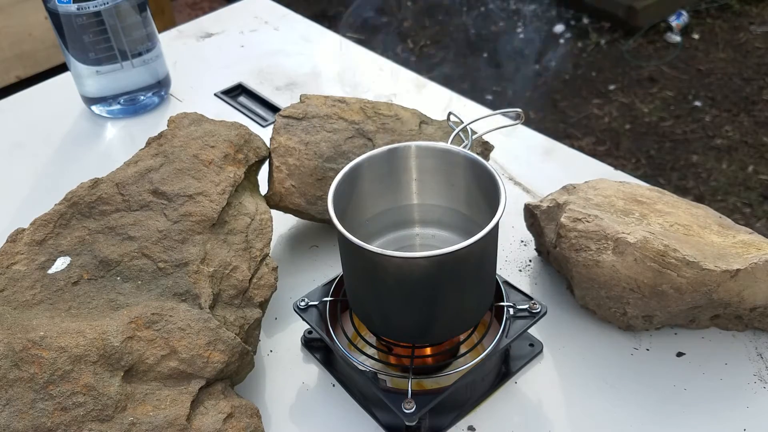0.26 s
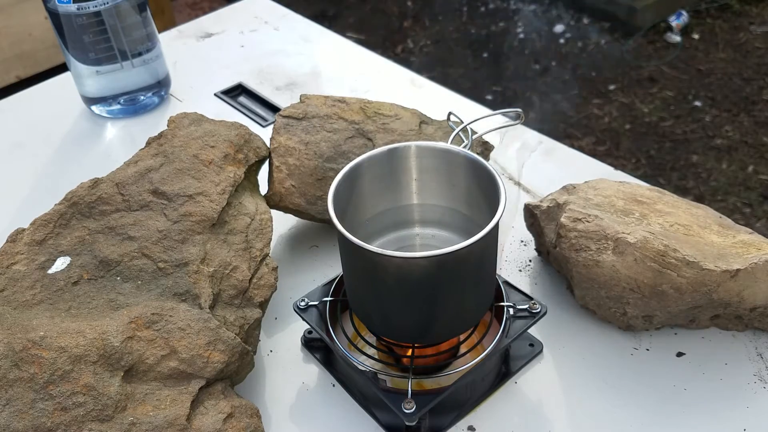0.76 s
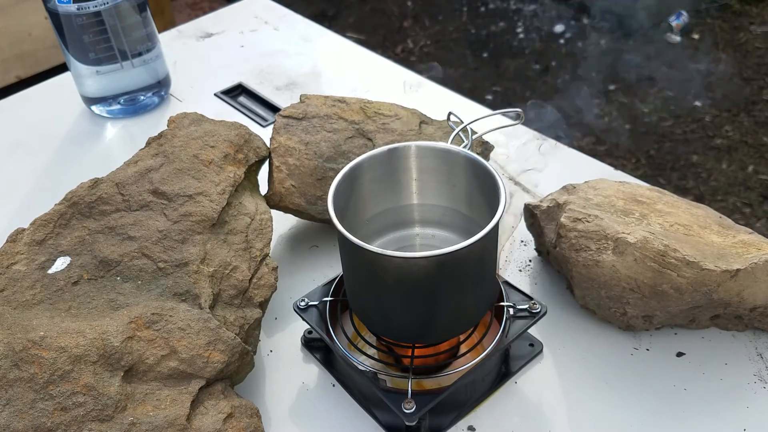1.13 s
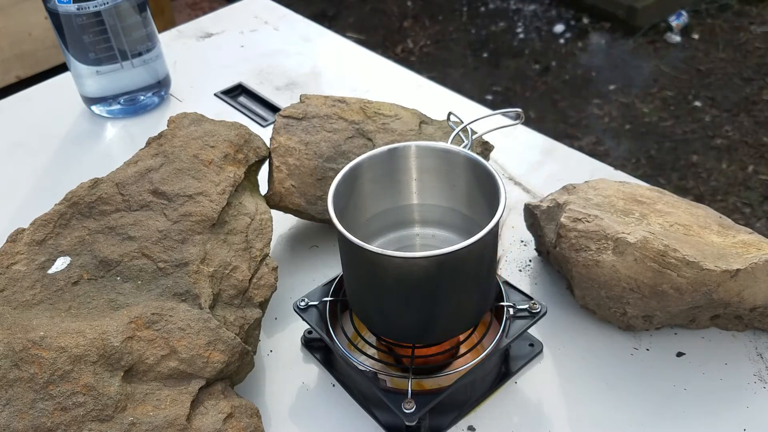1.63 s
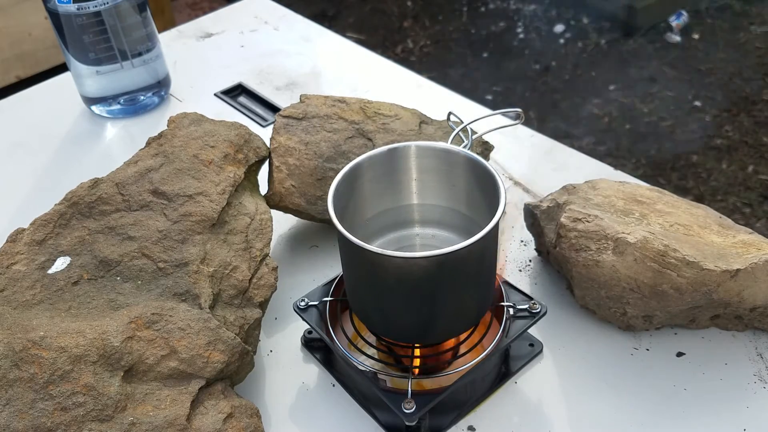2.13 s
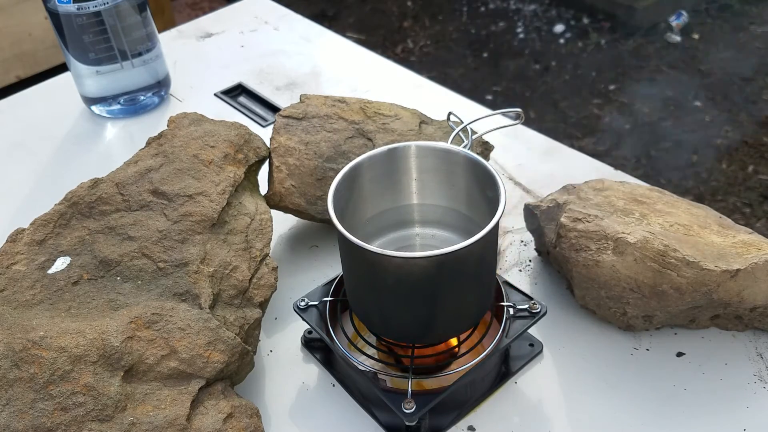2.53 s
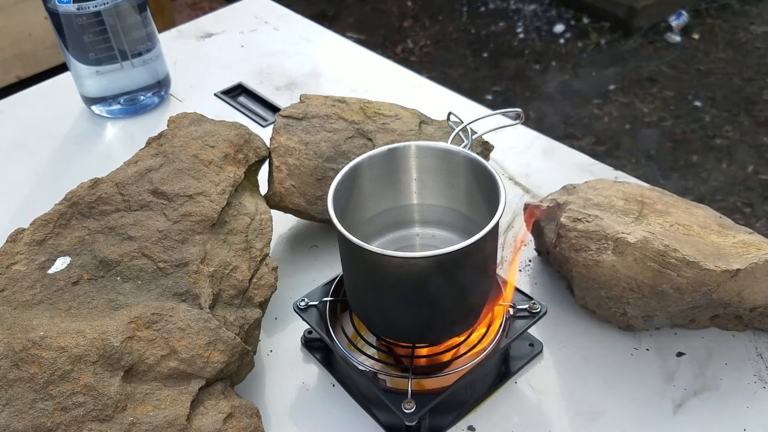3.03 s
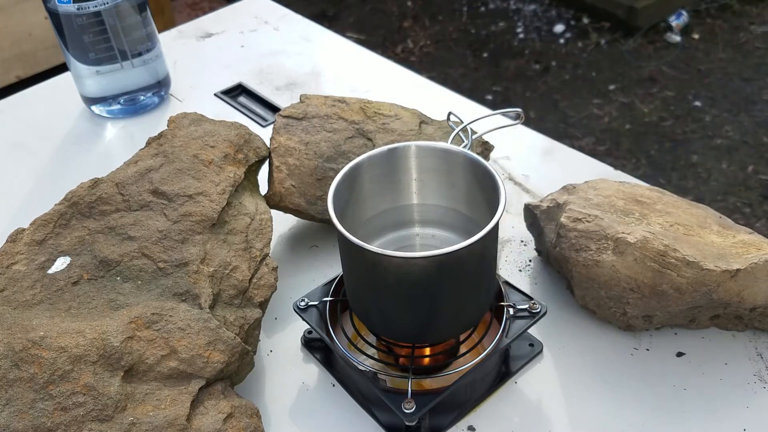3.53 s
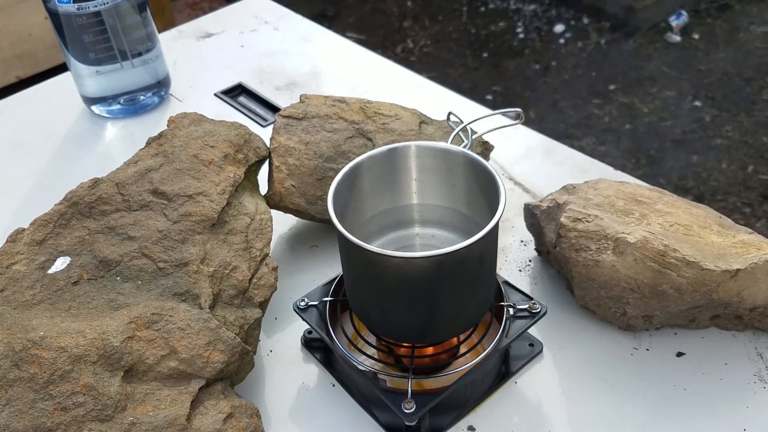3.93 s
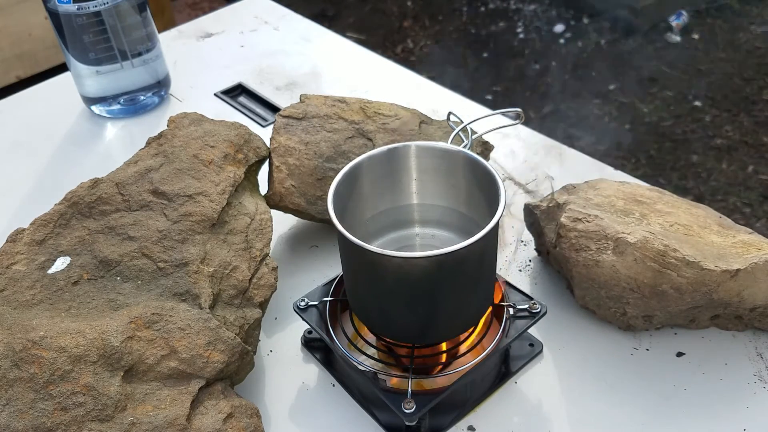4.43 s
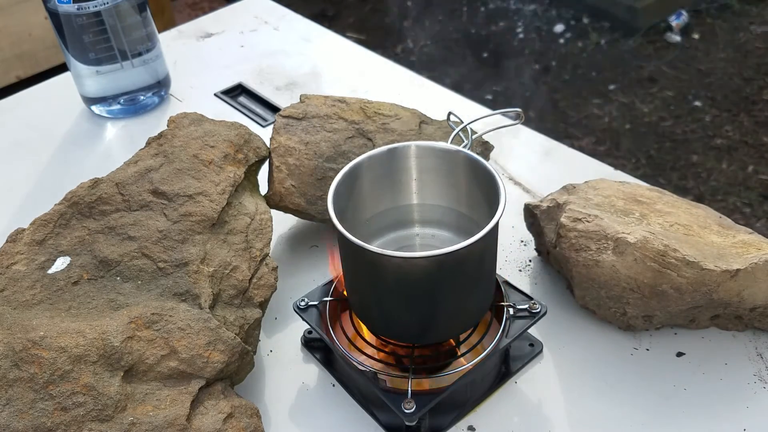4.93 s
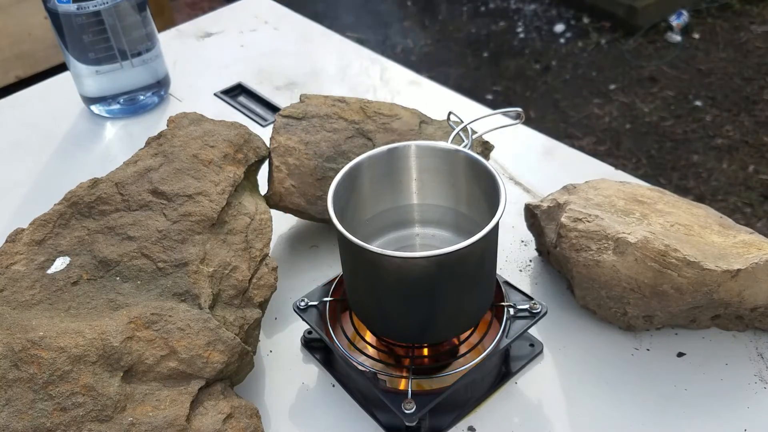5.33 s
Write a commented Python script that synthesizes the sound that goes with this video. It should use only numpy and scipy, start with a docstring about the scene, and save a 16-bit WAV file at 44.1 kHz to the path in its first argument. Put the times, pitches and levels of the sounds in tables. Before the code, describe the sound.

Deep single barks from a near dog and a hoarse farther one echo outdoors, with crackling, hissing stove fuel close in front.

```python
"""Two large dogs bark at each other across a yard: one close by, with a clear "woo" that breaks into a rasp,
one farther off and hoarse. Close in front a small camp stove sizzles and spits; behind lie distant traffic,
soft low thumps of air, faint high tones and one thin, airy screech.
Barks: modelled vocal folds through mouth resonances, with wall echoes and a decaying tail.
Stove and background: shaped noise under level curves."""
import sys
import numpy as np
from scipy import signal
from scipy.io import wavfile
from scipy.ndimage import uniform_filter1d, minimum_filter1d, map_coordinates

SR = 44100
rng = np.random.default_rng(int(sys.argv[2]) if len(sys.argv) > 2 else 0)


def file_out(sig):
    """Save sig as 16-bit WAV at sys.argv[1]."""
    # one column per channel
    cols = np.atleast_2d(sig).T
    # limit, then scale
    lim = np.clip(cols, -1, 1)
    pcm = np.round(lim * 32767).astype(np.int16)
    wavfile.write(sys.argv[1], SR, pcm)


N = 245809


def from_db(db):
    """Decibels to gain."""
    return 10 ** (np.asarray(db) / 20)


def rms_one(x):
    """Scale to rms 1."""
    return x / np.sqrt(np.mean(x ** 2) + 1e-20)


def ramp(t, length_s):
    """Rise from 0 to 1 over length_s, starting at t = 0."""
    return np.clip(t / max(length_s, 1e-4), 0, 1)


def in_time(rows, t):
    """Columns of a curve table at the times t."""
    s, *columns = np.transpose(rows)
    return [np.interp(t, s, c) for c in columns]


def at_hz(points, hz):
    """Columns of a spectrum table at one frequency, interpolated over log frequency."""
    f, *columns = np.transpose(points)
    return [np.interp(np.log(hz), np.log(f), c) for c in columns]


def add(out, s, x):
    """Mix x into out from time s on."""
    i = max(round(s * SR), 0)
    out[i:i + len(x)] += x[:max(N - i, 0)]


def drift(rate_per_s, size):
    """Smooth chance of spread about 1, from rate_per_s random knots a second."""
    knots = rng.standard_normal(int(size * rate_per_s / SR) + 4)
    position = 1 + rng.random() + np.arange(size) * rate_per_s / SR
    return map_coordinates(knots, [position], order=2, mode="nearest")


def band(x, hz, width_hz):
    """A steep-sided resonance, geometrically centred on hz."""
    low = np.hypot(hz, width_hz / 2) - width_hz / 2
    high = min(low + width_hz, SR / 2 - 1000)
    return signal.sosfilt(signal.butter(2, [low, high], "band", fs=SR, output="sos"), x)


def even(x, span_s=0.0081):
    """Hold the short-term rms at 1."""
    return x / np.sqrt(np.abs(uniform_filter1d(x * x, int(span_s * SR))) + 1e-12)


def noise_bands(size, likeness):
    """Half-octave bands of stereo noise with their centres; likeness is the left-right correlation."""
    white = rng.standard_normal((2, 2, size))
    for k, hz in enumerate(np.geomspace(28, 14336, 19)):
        mid, side = band(white[k % 2], hz, hz / np.sqrt(8))   # adjacent bands use separate noise
        alike = np.clip(at_hz(likeness, hz)[0], 0, 1)
        yield hz, np.sqrt(1 + alike) * mid + np.sqrt(1 - alike) * np.array([side, -side])


def coloured(spectrum, patchy_db):
    """Stereo noise of a given spectrum, each band wavering by itself; rms 1."""
    # left-right likeness: f/Hz, correlation 0-1
    likeness = [(60, .35), (140, .78), (210, .93), (400, .98), (1130, .97), (2600, .9), (12000, .92)]
    total = 0
    for hz, noise in noise_bands(N, likeness):
        waver = np.repeat(drift(700, N // 64 + 1), 64)[:N]   # stretched 64-fold: about 11 knots a second
        total = total + noise * from_db(at_hz(spectrum, hz)[0] + patchy_db * waver)
    return rms_one(total)


def traffic(level_db):
    """Distant traffic under a faint hiss: steady noise, strongest in the low and middle range."""
    # f/Hz, relative density/dB per Hz
    spectrum = [(28, -20.5), (55, -16.5), (100, -10), (190, -1), (400, -3), (760, 0), (1150, -5.5),
                (1850, -26), (2400, -28), (3400, -33), (7000, -36.5), (11000, -41), (14300, -47)]
    return from_db(level_db) * coloured(spectrum, patchy_db=.8)


def whine():
    """Thin, unsteady high tones: very narrow bands of noise."""
    # f/Hz, level/dB
    tones = [(2270, -69), (5561, -74.5), (11063, -78)]
    return sum(from_db(db) * rms_one(band(rng.standard_normal(N), hz, .009 * hz)) for hz, db in tones)


def screech(t, spread_hz, breath_db):
    """A narrow, airy band of noise that rises and sinks, over a broader breath."""
    # t/s, centre f/Hz, whistle level/dB
    glide = [(.74, 3290, -62), (.79, 3700, -61), (.865, 3910, -57.5), (.93, 3740, -59.5), (1.07, 3490, -64),
             (1.13, 3250, -75)]
    hz, db = in_time(glide, t)
    whistle = rms_one(np.sin(2 * np.pi * np.cumsum(hz) / SR) * drift(spread_hz, N))
    breath = rms_one(band(rng.standard_normal(N), 2900, 1200))
    sounding = (t > glide[0][0]) * (t < glide[-1][0])
    return from_db(db) * (whistle + from_db(breath_db) * breath) * sounding


def buffets(t, centre_hz, length_s):
    """Light air buffets the microphone: soft low thumps, independent left and right."""
    # peak t/s, level/dB
    thumps = [(2.6, -59), (3.44, -45), (4.43, -43.5), (4.63, -44), (5.05, -46.5)]
    push = sum(from_db(db) * np.exp(-((t - s) / length_s) ** 2) for s, db in thumps)
    return push * rms_one(band(rng.standard_normal((2, N)), centre_hz, centre_hz))


def jet(t):
    """Vapour escapes in one smooth hiss that dies away."""
    # t/s, level/dB
    decay = [(0, -45), (.17, -46), (.27, -53.5), (.38, -58.5), (.46, -66)]
    # f/Hz, relative density/dB per Hz
    spectrum = [(1500, -27), (2800, -1), (4000, -12), (5400, -6.5), (7000, -23.5), (9000, -22.5)]
    level_db, = in_time(decay, t)
    return from_db(level_db) * coloured(spectrum, patchy_db=1.0) * (t < decay[-1][0])


def sizzle(t, level_db):
    """The fuel sizzles in spurts: grainy hiss, swelling and dying exponentially."""
    # peak t/s, level/dB ahead of level_db, swell time/s, dying time/s
    spurt_rows = [(0.1, -50.5, .4, 0.13), (0.49, -45, 0.024, 0.087), (1.16, -47, 0.023, 0.13),
                  (1.84, -46, 0.061, 0.15), (1.933, -39.5, 0.045, 0.021), (2.14, -42, 0.033, .015),
                  (2.51, -40, .03, 0.032), (2.68, -48.5, 0.071, 0.081), (2.96, -44.5, 0.11, 0.039),
                  (3.012, -33.5, 0.032, 0.034), (3.085, -41, 0.011, 0.01), (3.612, -42, 0.042, 0.054),
                  (3.69, -43.5, 0.0088, 0.031), (3.8, -50, 0.029, 0.032), (4.06, -49.5, 0.048, .08),
                  (4.15, -46.5, 0.11, 0.053), (4.22, -45.5, .012, 0.015), (4.42, -46, 0.0058, 0.042)]
    # f/Hz, relative density/dB per Hz
    spectrum = [(1000, -30), (2200, 9), (3100, -6), (4300, -6.5), (6200, 0), (8500, -7), (11000, -16),
                (13500, -8), (15500, -28.5)]
    simmer_db = -67   # floor between spurts, ahead of level_db
    spurts = [from_db(db) * np.exp(-np.maximum((s - t) / swell_s, (t - s) / dying_s))
              for s, db, swell_s, dying_s in spurt_rows]
    vigour = np.maximum(np.max(spurts, axis=0), from_db(simmer_db))
    grains = rms_one(from_db(4.2 * np.clip(drift(900, N), -1.5, 2.8)))
    return from_db(level_db) * vigour * coloured(spectrum, patchy_db=1.0) * grains


def spits(level_db, crack_s, fizz_s, fizz_db):
    """The fuel spits: a droplet bursts with a crack and fizzes out unevenly."""
    # t/s, peak level/dB ahead of level_db, centre f/Hz
    droplets = [(0.234, -38, 7000), (0.487, -31.5, 5900), (1.922, -27.5, 5360), (2.101, -34, 5000),
                (2.129, -23.5, 1940), (2.137, -36, 5300), (2.287, -36, 5730), (2.511, -30.5, 6335),
                (3.003, -27, 5710), (3.619, -28, 5400), (3.8, -40, 7000), (4.146, -31, 6050),
                (4.421, -51, 3970), (4.466, -44, 5000), (4.924, -47, 5930)]
    out, t = np.zeros(N), np.arange(SR // 10) / SR
    for s, db, hz in droplets:
        crack = np.exp(-t / crack_s)
        fizz = from_db(fizz_db + 4.3 * drift(270, len(t))) * np.exp(-t / fizz_s)
        width_hz = min(hz, hz * hz / 3500)   # big, low droplets ring more narrowly
        burst = band(rng.standard_normal(len(t)) * (crack + fizz), hz, width_hz)
        add(out, s, from_db(db + level_db) * burst / np.abs(burst).max())
    return out


def yard(x, echoes, tail_db, build_s):
    """Direct sound, smeared echoes from walls left and right, and a tail that builds up and dies by band."""
    # f/Hz, relative density/dB per Hz, t60/s
    decay = [(150, -6, 1), (400, -5.5, 0.92), (1000, -3, 0.9), (2000, -1.5, 1), (6000, -4, .4),
             (15000, -13.5, .25)]
    # left-right likeness of the tail: f/Hz, correlation 0-1
    tail_likeness = [(150, 1), (430, 1), (750, 1), (1200, 0.48), (2000, 1), (5000, .3)]
    slant_s = .00004   # each channel's shift from the mean arrival
    t = np.arange(SR) / SR
    tail = 0
    for hz, noise in noise_bands(SR, tail_likeness):
        db, t60_s = at_hz(decay, hz)
        tail = tail + noise * from_db(db - 60 * t / t60_s)
    response = from_db(tail_db) * tail * (1 - np.exp(-t / build_s)) / np.sqrt(SR / 10)
    for k, (delay_s, db) in enumerate(echoes):
        arrival_s = delay_s + slant_s * (-1) ** k * np.array([[1], [-1]])   # walls alternate sides
        smear = np.exp(-((t - arrival_s) / 6e-5) ** 2)
        response += from_db(db) * smear / smear.sum(axis=1, keepdims=True)
    return x + signal.fftconvolve(x[None], response, axes=1)[:, :N]


def resonances(source, modes):
    """Sum of the throat's resonances, held at an even level."""
    return even(sum(band(source, hz, width_hz) * from_db(db) for hz, width_hz, db in modes))


def bark(t, pitch_hz, rough, chest_db, mouth_db, snarl_db, mouth, snarl, hiss,
         jitter, shimmer, rasp, chaos, puff_db, push_s):
    """Vocal folds swing cleanly or break into chaos; the mouth's resonances open above the fundamental."""
    size = len(t)
    rough = np.clip(rough, 0, 1)
    phase = 2 * np.pi * np.cumsum(pitch_hz * (1 + jitter * rough * drift(328.2, size))) / SR
    flutter = 1 + shimmer * rough * np.tanh(drift(188.45, size))   # uneven swings make the rasp
    fundamental = np.sin(phase) * flutter + chaos * rough * drift(200, size) * np.cos(phase)
    # the mouth radiates little below the fundamental
    radiation = signal.butter(4, 350, "high", fs=SR, output="sos")
    fundamental = even(signal.sosfilt(radiation, fundamental), span_s=.03)
    # a nearly symmetric swing favours the odd harmonics
    harmonics = [np.cos(k * phase) / k ** .5 * (1 if k % 2 else from_db(-9)) for k in range(2, 8)]
    pulses = rms_one(sum(harmonics))
    air = rng.standard_normal(size) * (1 + np.cos(phase) / 2)   # air passes while the folds are open
    source = ((1 - rough) * pulses + rasp * rough * air) * flutter
    jaw, teeth = resonances(source, mouth), resonances(source, snarl)
    # push of air from the chest, strongest at the start: 4.5 dB above to 4.5 dB below its middle level
    first_push = from_db(4.5 * (1 - 2 * ramp(t - t[0], push_s)))
    puff = rms_one(band(air, 262, 180)) * (0.56 + rough) * first_push
    puff += from_db(-11.5) * rms_one(band(air, 70, 76))
    voice = from_db(chest_db) * fundamental + from_db(puff_db + 0.51 * chest_db) * puff
    voice += from_db(mouth_db) * (jaw + from_db(snarl_db) * teeth)
    # the soft muzzle swallows the treble
    voice = signal.sosfilt(signal.butter(6, 2800, fs=SR, output="sos"), voice)
    hiss_hz, hiss_width_hz, hiss_db = hiss   # air between the teeth, dB relative to the mouth
    voice += from_db(mouth_db + hiss_db) * rms_one(band(air, hiss_hz, hiss_width_hz))
    voice *= from_db(1.35 * rough * drift(69.8, size))   # a rough voice comes in uneven shoves
    return voice * np.clip((t - t[0]) / 0.00098, 0, 1) * np.clip((t[-1] - t) / 0.0051, 0, 1)


def dog(barks, gesture, **throat):
    """All barks of one dog: the gesture turns each row into the controls of the throat."""
    out = np.zeros(N)
    for row in barks:
        t, *controls = gesture(*row)
        add(out, t[0], bark(t, *controls, **throat))
    return out


def hoarse_bark(peak_at_s, swell_s, hold_s, top_hz, rough, chest_db, drop_db, mouth_db, snarl_db):
    """Level and pitch swell out of silence with the push of air, hold, and trail off in a snarl."""
    release_s, drop_s = .14, 0.014   # the fundamental drops when the push ends
    swell_depth_db, swell_curve = 15, 1.65   # rounds off towards its top
    swell_rise_hz, sag_hz_per_s = 40.6, 170
    chest_fall_db_per_s, mouth_fall_db_per_s = 54.5, 154
    slack_rough = .25   # added where the voice is weak
    baring_db_per_s, lips_shut_db = 32.5, 3.5   # the snarl grows as the lips draw back
    t = np.arange(-min(2 * swell_s, peak_at_s), hold_s + release_s, 1 / SR)
    weak, dropped = ramp(-t, swell_s), ramp(t - hold_s, drop_s)
    swell_db = -swell_depth_db * np.maximum(-t / swell_s, 0) ** swell_curve
    released_s = np.maximum(t - hold_s, 0)
    pitch_hz = top_hz - swell_rise_hz * weak - sag_hz_per_s * released_s
    rough = rough + slack_rough * (weak + dropped)
    chest_db = chest_db + swell_db - drop_db * dropped - chest_fall_db_per_s * released_s
    mouth_db = mouth_db + swell_db - mouth_fall_db_per_s * released_s
    snarl_db = snarl_db - lips_shut_db * weak + baring_db_per_s * t
    return peak_at_s + t, pitch_hz, rough, chest_db, mouth_db, snarl_db


def far_dog():
    """The far dog: hoarse swells through a rough throat, with strong wall echoes."""
    # swell top t/s, swell/s, hold/s, top pitch f/Hz, roughness 0-1 ahead of slack, fundamental level/dB,
    # its drop after the hold/dB, mouth level/dB, snarl level/dB re mouth
    barks = [(0.004, .06, 0.015, 417.3, .45, -13, 7, -22.5, -9),
             (0.660, .064, 0.046, 441.2, 0.45, -12.5, 15, -22.5, -9),
             (1.198, .072, 0.029, 395.1, 0.74, -15.5, 8, -16.5, -12),
             (1.630, 0.059, 0.04, 409.1, 0.89, -17.5, 5.5, -19.5, -14.5),
             (2.840, .064, 0.04, 401.7, 0.6, -15, 8, -17, -14.5)]
    # open-mouth resonances: f/Hz, width/Hz, relative level/dB
    mouth = [(732, 147, 2), (1064, 187, 0.5), (1367, 100, -18)]
    # upper resonances of the snarl: f/Hz, width/Hz, relative level/dB
    snarl = [(1743, 180, 26.5), (2530, 240, -13)]
    # wall echoes: delay/s, level/dB re direct
    echoes = [(.027, -6), (0.069, -12), (0.118, -29), (0.171, -19.5)]
    voice = dog(barks, hoarse_bark, mouth=mouth, snarl=snarl, hiss=(5140, 1400, -38.5),
                jitter=0.069, shimmer=1.0, rasp=8.4, chaos=0.84, puff_db=-29.5, push_s=0.27)
    return from_db(0.04) * yard(voice, echoes, tail_db=-5.0, build_s=0.0087)


def woo_bark(start_s, attack_s, lead_s, woo_s, rasp_s, start_hz, top_hz, sag_hz_per_s,
             woo_rough, woo_db, rasp_db, catch_db, mouth_db, snarl_db):
    """The folds lock into a clear tone while the jaw opens, break into a rasp, catch once more and let go."""
    attack_db, pitch_rise_s, release_s = 21, .052, 0.083
    lead_below_db, lead_rough, rasp_rough = 6.5, 0.54, 0.97   # the lead-in lies under the woo
    lock_s, break_s = 0.0027, 0.014   # the folds lock into the woo, and break out of it
    hitch_s, hitch_dip_db, hitch_flare_db = 0.0059, 10.5, 7.5   # fundamental gives way, mouth flares
    catch_after_s, catch_s, catch_clears = .047, 0.011, 0.77   # delay after the woo, half length, share
    jaw_lag_s, jaw_close_s = 0.053, 0.087   # the jaw is widest just after the woo
    jaw_shut_db, teeth_shut_db = 10, 6   # loss of mouth and snarl with the jaw shut
    chest_fall_db_per_s, mouth_fall_db_per_s = 381.5, 190.5
    break_at_s = lead_s + woo_s
    t = np.arange(0, break_at_s + rasp_s + release_s, 1 / SR)
    locked, broken = ramp(t - lead_s + lock_s, lock_s), ramp(t - break_at_s, break_s)
    hitch = np.exp(-((t - lead_s + lock_s + hitch_s) / hitch_s) ** 2)
    catch = np.exp(-((t - break_at_s - catch_after_s) / catch_s) ** 2)
    released_s = np.maximum(t - break_at_s - rasp_s, 0)
    onset_db = attack_db * (ramp(t, attack_s) - 1)
    widest_at_s = break_at_s + jaw_lag_s
    shut = 1 - ramp(t, widest_at_s) + ramp(t - widest_at_s, jaw_close_s)
    pitch_hz = start_hz + (top_hz - start_hz) * ramp(t, pitch_rise_s)
    pitch_hz -= sag_hz_per_s * np.maximum(t - lead_s - woo_s / 2, 0)   # sags from mid-woo on
    rough = woo_rough + (lead_rough - woo_rough) * (1 - locked)
    rough += (rasp_rough - woo_rough) * broken * (1 - catch_clears * catch)
    chest_db = woo_db - lead_below_db * (1 - locked) + (rasp_db - woo_db) * broken
    chest_db += (catch_db - rasp_db) * catch
    chest_db += onset_db - hitch_dip_db * hitch - chest_fall_db_per_s * released_s
    mouth_db = mouth_db + onset_db + hitch_flare_db * hitch - jaw_shut_db * shut
    mouth_db -= mouth_fall_db_per_s * released_s
    return start_s + t, pitch_hz, rough, chest_db, mouth_db, snarl_db - teeth_shut_db * shut


def near_dog():
    """The near dog: a gruff lead-in, a hitch, a clear "woo", then a rasp in which the voice catches."""
    # start t/s, attack/s, lead-in/s, woo/s, rasp/s, starting pitch f/Hz, top pitch f/Hz ahead of sag,
    # sag/Hz per s, woo roughness 0-1, fundamental level/dB in woo, in rasp, at catch,
    # open mouth level/dB, snarl level/dB re mouth
    barks = [(0.155, 0.011, 0.0319, 0.0448, 0.06, 342.4, 439.8, 200.5, 0.27, -6.5, -27, -12.5, -15, -15.5),
             (2.385, 0.035, 0.0541, 0.0424, 0.099, 399, 443.6, 299.5, 0.12, -3.5, -22, -6, -16, -6.5),
             (5.231, 0.006, 0.0373, 0.024, 0.057, 405.2, 450.4, 679.5, 0.5, -6, -12, -7, -17, -10.5),
             (5.499, .02, .02, 0.043, .060, 322.5, 458, 5, 0.14, -4, -23, -10.5, -20, -9.5)]
    # open-mouth resonances: f/Hz, width/Hz, relative level/dB
    mouth = [(573, 190, 7), (770, 54, 9), (1165, 143, 1.5), (971, 170, -2)]
    # upper resonances of the snarl: f/Hz, width/Hz, relative level/dB
    snarl = [(1908, 180, 23), (2170, 1900, -2), (2650, 400, -30.5)]
    # wall echoes: delay/s, level/dB re direct
    echoes = [(0.021, -17), (0.059, -15), (.094, -18), (0.212, -26), (0.3, -24.5)]
    voice = dog(barks, woo_bark, mouth=mouth, snarl=snarl, hiss=(5200, 1900, -38),
                jitter=.1, shimmer=0.88, rasp=9.9, chaos=1.0, puff_db=-25.5, push_s=.075)
    return yard(voice, echoes, tail_db=-13.5, build_s=0.0068)


def scene():
    """Dogs in the yard, the stove in front, traffic behind."""
    t = np.arange(N) / SR
    background = traffic(level_db=-38.5) + whine()
    background += screech(t, spread_hz=340, breath_db=5.5) + buffets(t, centre_hz=69, length_s=0.032)
    stove = jet(t) + sizzle(t, level_db=-3.5)
    stove += spits(level_db=-1.5, crack_s=.0012, fizz_s=.01, fizz_db=-13)
    dogs = far_dog() + near_dog()
    # dogs and stove sit slightly left
    return dogs * from_db([[.13], [-.13]]) + stove * from_db([[.4], [-.4]]) + background


def record(dry):
    """A fast limiter ducks the loudest swings; the top is cut."""
    ceiling, hold, cutoff_hz = .94, int(.006 * SR), 15200   # hold in samples
    gain = ceiling / np.maximum(np.abs(dry).max(axis=0), ceiling)
    gain = uniform_filter1d(minimum_filter1d(gain, hold), hold)
    top_cut = signal.ellip(8, .1, 60, cutoff_hz, fs=SR, output="sos")
    return signal.sosfiltfilt(top_cut, dry * gain)


dry = scene()
out = record(dry)
file_out(out)
```